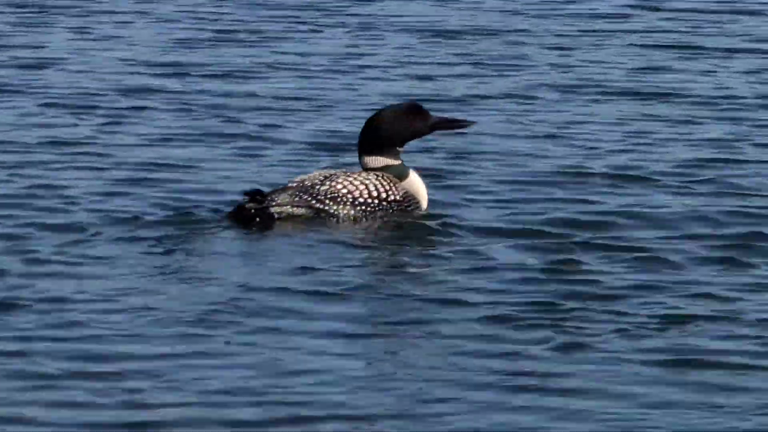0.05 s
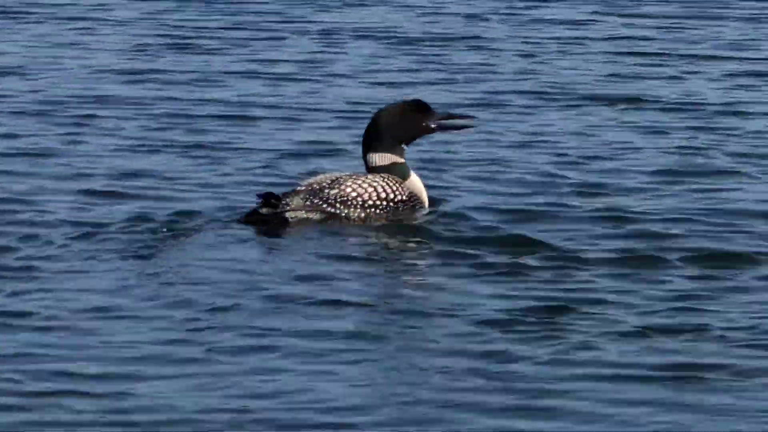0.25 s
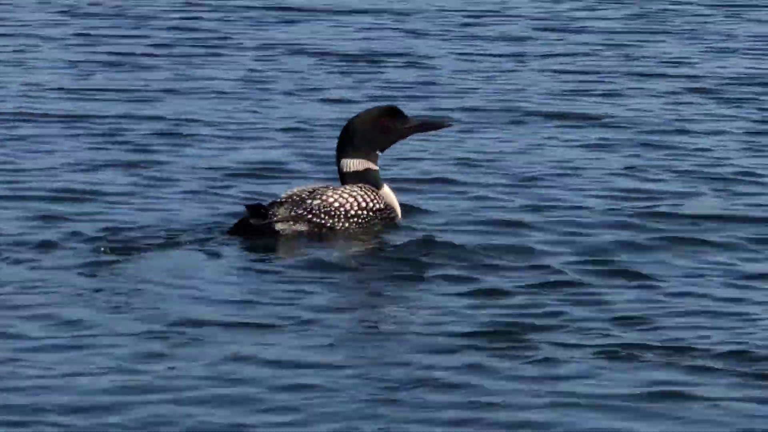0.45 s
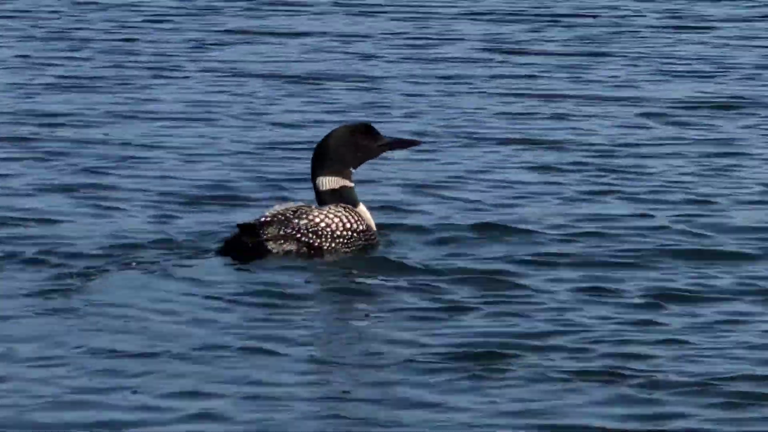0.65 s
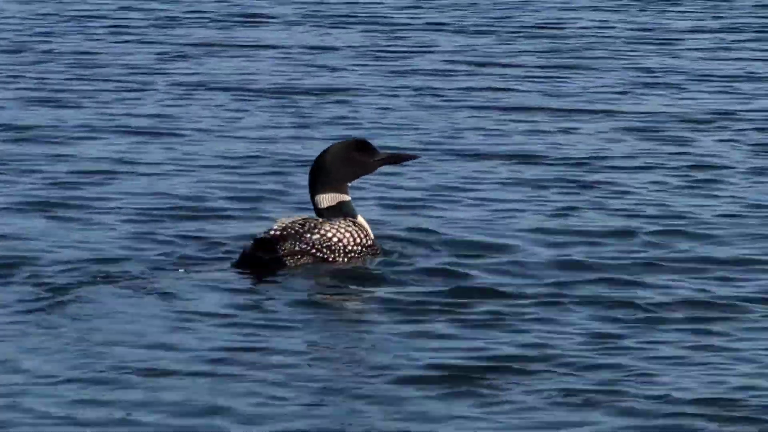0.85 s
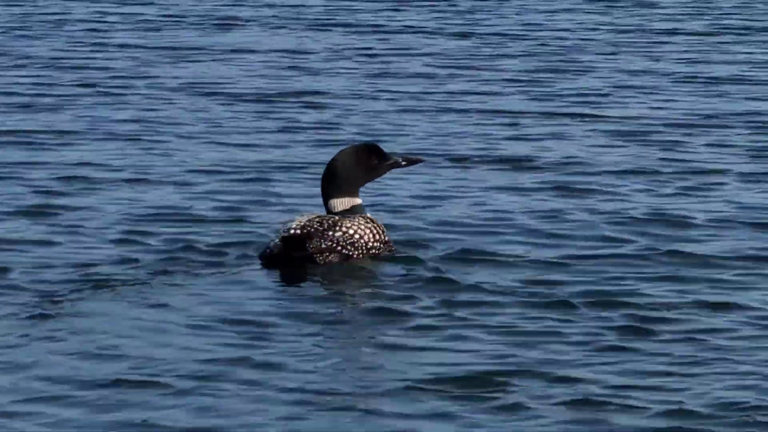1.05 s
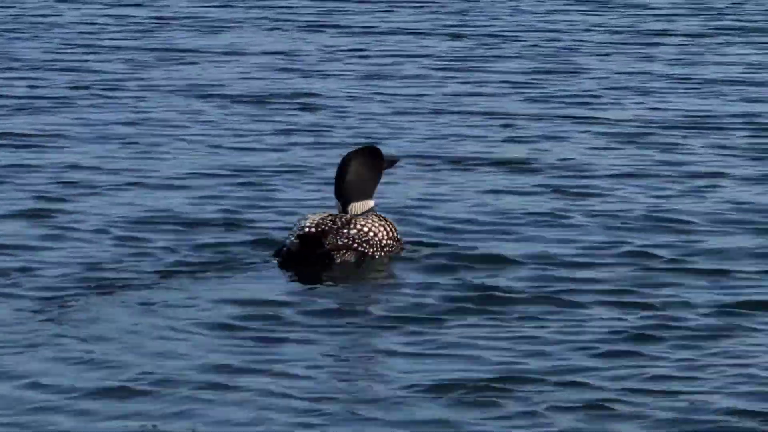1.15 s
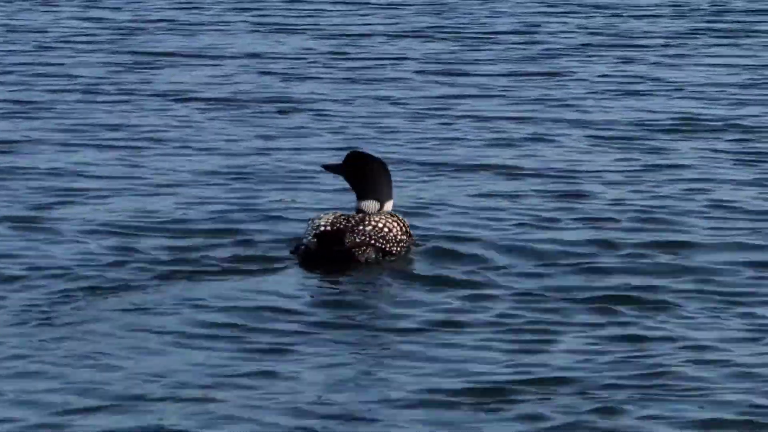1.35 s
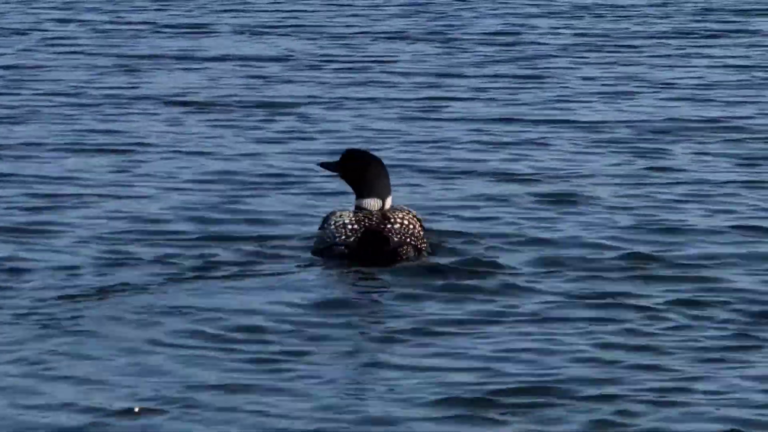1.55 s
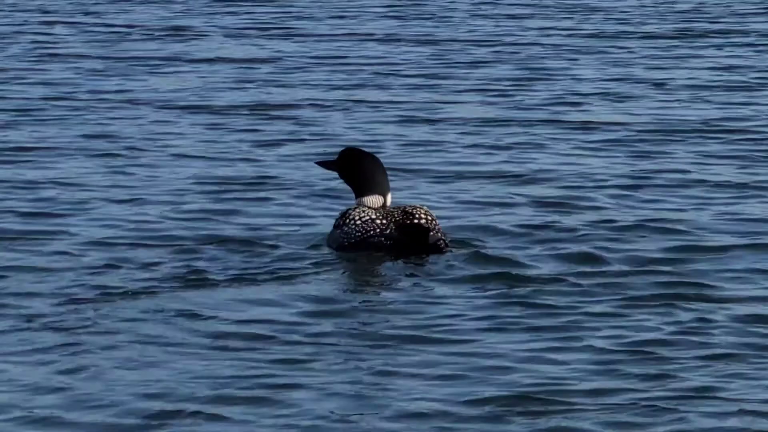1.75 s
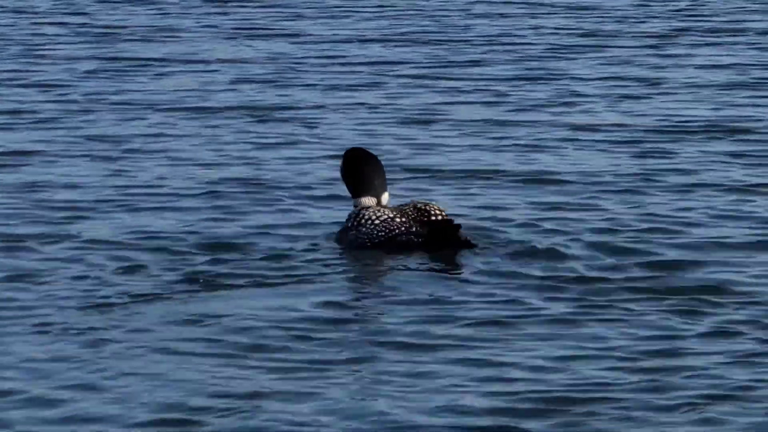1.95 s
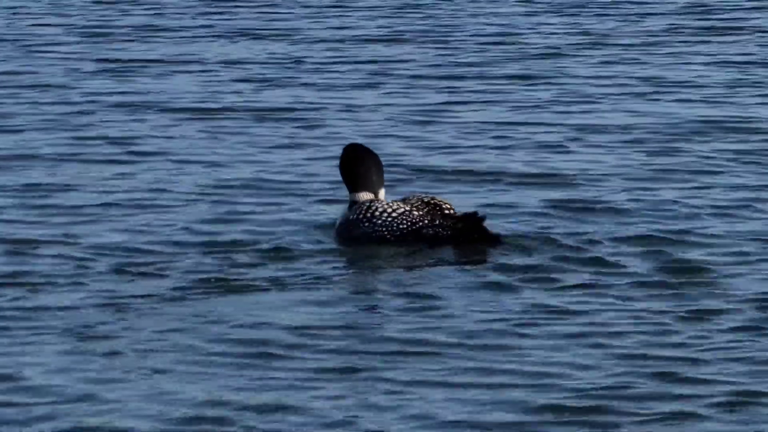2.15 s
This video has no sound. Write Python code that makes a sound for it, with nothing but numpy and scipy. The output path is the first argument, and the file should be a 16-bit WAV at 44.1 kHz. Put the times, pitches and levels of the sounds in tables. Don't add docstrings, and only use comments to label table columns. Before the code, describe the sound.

Loud loon calls, a smooth wail and a yodelling three-beat tremolo, echo faintly across a windy lake

```python
import sys
import numpy as np
from scipy import signal
from scipy.io import wavfile
from scipy.ndimage import uniform_filter1d, minimum_filter1d

SR = 44100
rng = np.random.default_rng(int(sys.argv[2]) if len(sys.argv) > 2 else 0)


def rack_gain(trim_db):
    fader = np.asarray(trim_db, float)
    return 10 ** (fader / 20)


def pcm_store(signal):
    levels = np.round(np.clip(np.atleast_2d(signal), -1, 1) * 32767)
    wavfile.write(sys.argv[1], SR, levels.astype(np.int16).T)


N = 97020
T = np.arange(N) / SR
SIDES = np.array([[1], [-1]])


def band(x, lo_hz, hi_hz):
    return signal.sosfilt(signal.butter(2, [lo_hz, min(hi_hz, .45 * SR)], "band", fs=SR, output="sos"), x)


def unit(x):
    return x / np.sqrt(np.mean(x ** 2))


def walk(rate_hz):
    k = int(SR / rate_hz)
    return unit(uniform_filter1d(uniform_filter1d(rng.standard_normal(N), k), k))


# [hz, level_db per Hz]
LAKE_SPECTRUM = [(100, 2), (300, -8), (700, -9), (1100, -21), (2700, -19), (4200, -27.5), (7300, -41.5),
                 (11500, -30), (14000, -30)]


def lake():
    level_db, wide_hz, top_left_db = -62.5, 1300, 4
    table_hz, table_db = np.array(LAKE_SPECTRUM).T
    out, swell = 0, walk(6.7)
    for hz in 100 * 2 ** np.arange(0, 7.1, 1 / 3):
        mid, side = unit(band(rng.standard_normal((2, N)), hz / 2 ** (1 / 6), hz * 2 ** (1 / 6)))
        db = np.interp(np.log(hz), np.log(table_hz), table_db) + 10 * np.log10(hz)
        db = db + (swell + 2.1 * walk(19)) * min(1500 / hz, 1)
        db = db + (hz > 7500) * top_left_db * SIDES / 2
        width = np.clip(hz / wide_hz, .3, 1)
        out = out + rack_gain(db) * (mid + width * side * SIDES)
    return rack_gain(level_db) * out / np.sqrt(np.mean(out.mean(axis=0) ** 2))


# [centre_s, half_length_s, level_db, rattle_db above the low push]
GUSTS = [(0.049, 0.32, -57, -6.5), (0.25, 0.11, -53.5, -17), (0.328, 0.067, -52.5, -14),
         (0.444, 0.076, -45, -11.5), (0.557, 0.1, -53.5, -14), (0.697, 0.081, -50.5, -17.5),
         (0.761, 0.056, -37, -31), (0.865, 0.077, -44.5, -13), (0.944, 0.028, -50, 0.5),
         (0.982, 0.035, -52.5, -7), (1.067, 0.054, -50.5, -12), (1.221, 0.052, -44.5, -7),
         (1.534, 0.078, -64, 3.5), (1.715, 0.053, -49, -25.5), (1.79, 0.049, -41, -36),
         (1.905, 0.12, -52, -17.5), (2.018, 0.081, -58, -7)]


def wind():
    wind_hz, wind_side, rattle_side, left_db, calm_db = 53, .75, .3, -.5, -67.5
    mid, side = rng.standard_normal((2, N))
    air = mid + wind_side * side * SIDES
    low = unit(band(band(air, .55 * wind_hz, 1.364 * wind_hz), 22, 87))
    rattle = unit(band(mid + rattle_side * side * SIDES, 100, 380))
    push, shake = rack_gain(calm_db), 0
    for centre, half, db, rattle_db in GUSTS:
        puff = np.cos(np.clip((T - centre) / half, -1, 1) * np.pi / 2) ** 2
        push = push + rack_gain(db) * puff
        shake = shake + rack_gain(db + rattle_db) * puff
    shake = shake * rack_gain(4 * walk(60))
    return (push * low + shake * rattle) * rack_gain((1.7 * walk(4) + left_db / 2) * SIDES)


# [start_s, length_s, from_hz, to_hz, level_db]
CHIRPS = [(0.928, 0.021, 2570, 2720, -61.5), (0.953, 0.052, 3020, 3320, -70),
          (1.015, 0.025, 2370, 2500, -64), (1.033, 0.039, 3550, 3110, -71), (0.986, .025, 3253, 3400, -72),
          (.99, 0.04, 2620, 2640, -71), (1.09, 0.042, 3250, 3160, -73.5), (1.105, .035, 2890, 2629, -73),
          (1.125, .035, 3232, 3500, -74), (1.149, 0.04, 2840, 2530, -75), (1.48, .03, 2900, 3050, -73),
          (1.52, .035, 2850, 3350, -73.5), (1.5, 0.071, 2450, 2570, -71.5), (1.571, 0.021, 2796, 2730, -72),
          (1.581, 0.058, 2750, 2300, -71.5), (1.755, .03, 2200, 2300, -75), (1.775, .02, 2700, 2768, -72.5),
          (1.835, 0.032, 2850, 2800, -74), (1.854, .02, 4200, 3820, -74), (1.96, 0.027, 2880, 2910, -68),
          (2.148, .03, 2750, 2798, -68), (2.175, 0.027, 3080, 3220, -77), (1.719, 0.037, 2890, 2512, -70.5),
          (1.788, 0.034, 3700, 4230, -71), (1.791, .05, 2936, 2910, -66), (1.889, 0.05, 2960, 2490, -59.5),
          (1.927, 0.046, 2470, 2770, -66), (2.102, 0.041, 2760, 2690, -73)]


def songbirds():
    out = 0
    for start, length, from_hz, to_hz, db in CHIRPS:
        u = np.clip((T - start) / length, 0, 1)
        hz = (from_hz + (to_hz - from_hz) * u) * (1 + .014 * walk(90))
        phase = 2 * np.pi * np.cumsum(hz) / SR
        out = out + rack_gain(db + 2.1 * walk(120)) * np.sin(np.pi * u) * np.sin(phase + .4 * SIDES)
    return out


# [start_s, peak_db, ring_hz, t60_s, left_minus_right_db]
KNOCKS = [(.883, -66.5, 7040, .01, 4), (.921, -52, 626, 0.031, -9), (.929, -44.5, 630, 0.028, -10),
          (0.934, -31, 425, 0.032, -3.5), (0.932, -37.5, 144, 0.13, 4), (0.948, -69, 425, 0.029, -2),
          (1.201, -57.5, 1269, 0.025, 28), (1.207, -36, 1156, 0.029, -10.5), (1.21, -48, 2740, 0.013, 1),
          (1.21, -43, 1890, 0.01, -8), (1.214, -44, 291, 0.059, -1.5), (1.221, -47.5, 1250, 0.028, 12),
          (1.877, -49.5, 2080, .015, -10), (1.985, -68, 6700, 0.028, 6), (1.872, -48, 3030, 0.023, -5.5),
          (1.878, -45, 2690, 0.015, -7), (1.879, -57.5, 1100, 0.036, -6), (1.912, -42.5, 2540, 0.012, 4.5),
          (1.917, -43, 1934, 0.022, -10), (1.916, -53.5, 1050, 0.067, -9), (1.928, -49, 327, 0.075, 7),
          (1.945, -54, 11030, 0.0071, 1.5), (2.055, -47.5, 290.6, 0.074, -0.5)]


def hull():
    out = 0
    for start, db, hz, t60, pan_db in KNOCKS:
        t = np.clip(T - start, 0, None)
        shape = np.exp(-np.log(1000) * t / t60) * (1 - np.exp(-(t / .001) ** 2))
        ring = min(hz / 900, 1) * np.sin(2 * np.pi * hz * t)
        rattle = unit(band(band(rng.standard_normal(N), .7 * hz, 1.22 * hz), .6 * hz, 1.3 * hz))
        out = out + rack_gain(db + 2.5 + pan_db * SIDES / 2) * shape * (ring + .45 * rattle)
    return out


def echoes(x):
    water, shore = rng.standard_normal((2, 2, N))
    shore = unit(band(shore, 430, 720) + rack_gain(-12.5) * band(shore, 1100, 1700)) * rack_gain(2.5 * walk(12))
    tail = 0
    for noise, db, t60_s, rise_s in [(water, -31, .38, .06), (shore, -50, 3.6, .3)]:
        fade = np.exp(-np.log(1000) * T / t60_s) * np.clip(T / rise_s, 0, 1)
        tail = tail + rack_gain(db) * noise * fade / np.sqrt(np.sum(fade ** 2))
    return signal.fftconvolve(x.mean(axis=0)[None], tail)[:, :N]


def curve(rows):
    s, hz, db = np.array(rows).T
    k = int(.009 * SR)
    return uniform_filter1d(np.interp(T, s, hz), k), uniform_filter1d(np.interp(T, s, db, -140, -140), k)


def voice(hz, partials_db, ears):
    hz = hz * (1 + .0015 * walk(150))
    phase, out = 2 * np.pi * np.cumsum(hz) / SR, 0
    ear_hz, ear_db, ear_lead = np.array(ears).T
    for k, db in enumerate(partials_db, 1):
        at = np.log(k * hz)
        pan_db = np.interp(at, np.log(ear_hz), ear_db) * SIDES / 2
        lead = np.interp(at, np.log(ear_hz), ear_lead) * SIDES / 2
        rasp = 1 + rack_gain(-32) * k * walk(120)
        out = out + rack_gain(db + pan_db) * rasp * np.cos(k * phase + lead)
    return out


# [time_s, pitch_hz, level_db]
WAIL = [
    (.008, 614, -64),
    (.035, 623.6, -39),
    (.06, 632, -34.5),
    (.1, 649.8, -31.5),
    (.15, 659.5, -29.5),
    (.3, 657, -25),
    (.37, 658.2, -29),
    (.48, 640.7, -28.5),
    (.56, 640, -59),
]
WAIL_PARTIALS_DB = [-5.5, 3.5, -20, -48]
# [hz, left_minus_right_db, left_lead_rad]
FAR_EARS = [(640, 1.1, 0.2), (1300, -6, 1.2), (1920, -8.5, 0.27), (2684, -20, 6.5)]


def far_loon():
    hz, db = curve(WAIL)
    below_peak = db - db.max()
    parts = [db + p + 10 * min(k, 2) * below_peak / 20 for k, p in enumerate(WAIL_PARTIALS_DB)]
    return voice(hz, parts, FAR_EARS)


# [time_s, pitch_hz, level_db]
CLIMB = [
    (.165, 358, -67.5),
    (.18, 358, -41.5),
    (.205, 331.2, -36),
    (.22, 372, -31),
    (.24, 425.6, -22),
    (.255, 460.6, -20),
    (.272, 483.2, -23.5),
    (.286, 511, -20),
    (.296, 514.1, -60),
]
# [time_s, pitch_hz, level_db]
DROP = [
    (.758, 391.7, -63),
    (.77, 374, -42.5),
    (.782, 350.4, -43),
    (.8, 319, -52),
    (.812, 317, -87.5),
]
CLIMB_PARTIALS_DB = [-15, 0.5, -1, 2.5, -15.5, -38, -56]
DROP_PARTIALS_DB = [-0.5, -0.5, -1.5, -16.5, -26]
# [hz, left_minus_right_db, left_lead_rad]
NEAR_EARS = [(400, 1, -0.55), (640, 1, -0.46), (740, 2, -1.05), (940, -8.5, -0.082), (1230, -2, 0.1),
             (1430, -5.5, -.6), (1700, -4.5, -.2), (2300, -5.5, 0.79), (4795, -6, 1.6)]


def near_loon_low():
    hz, db = curve(CLIMB)
    below_peak = db - db.max()
    shut_db = -1900 * np.clip(T - .266, 0, None)
    parts = [db + p + 4.5 * k * below_peak / 20 + (k > 2) * shut_db for k, p in enumerate(CLIMB_PARTIALS_DB)]
    climb = voice(hz, parts, NEAR_EARS)
    hz, db = curve(DROP)
    return climb + voice(hz, [db + p for p in DROP_PARTIALS_DB], NEAR_EARS)


# [centre_hz, width_hz, level_db]
THROAT = [(3300, 400, -29), (3880, 250, -33.5), (4620, 350, -31), (5250, 550, -31.5), (6350, 550, -35),
          (7060, 450, -42.5), (8200, 500, -48.5), (9250, 600, -40), (9850, 400, -45), (10350, 310, -42),
          (11600, 270, -44.5)]


def throat_db(hz):
    return 10 * np.log10(sum(rack_gain(2 * g) / (1 + (2 * (hz - c) / w) ** 2) ** 2 for c, w, g in THROAT))


# [time_s, pitch_hz, level_db]
HOLD = [
    (.286, 628.3, -31.5),
    (.298, 628.9, -20.5),
    (.42, 650.2, -21),
    (.54, 640, -20.5),
    (.635, 626.4, -25),
    (.675, 614.7, -27),
    (.71, 622.3, -26.5),
    (.735, 602.5, -32),
    (.768, 565.4, -57),
]
# [centre_s, half_length_s, pitch_lift_hz, harshness_db]
BEATS = [
    (0.363, 0.047, 148, 0),
    (.469, 0.046, 148, 4),
    (0.586, 0.042, 98.7, -2.5),
]
# [rest_db, full_beat_gain_db]
HOLD_PARTIALS = [(-3, 13.5), (-0.5, 17.5), (-42.5, 30.5), (-52, 31), (1.5, -11), (2.5, -1.5), (-1, 1.5),
                 (-8, 7), (-4, 6.5), (-5.5, -10.5), (-3.5, 0), (0.5, 1), (0.5, 1), (-0.5, -1), (-1.5, 2),
                 (-1, 0.5)]


def near_loon_tremolo():
    hz, db = curve(HOLD)
    lift = 0
    for centre, half, up_hz, _ in BEATS:
        lift = lift + up_hz * np.cos(np.clip((T - centre) / half, -1, 1) * np.pi / 2).clip(0) ** 1.3
    lift = uniform_filter1d(lift, int(.002 * SR))
    full_lift_hz, bright_to_s, patchy_db = 148, .625, 3.5
    effort = lift / full_lift_hz
    late = np.interp(T - .006, T, lift) / full_lift_hz
    swell = (effort ** 2 * (3 - 2 * effort)) ** 1.15
    harsh_db = np.interp(T, [b[0] + .016 for b in BEATS], [b[3] for b in BEATS])
    dull_db = 28 * np.clip(np.minimum(T - .335, bright_to_s - T) / .018, -1, 0)
    cold_db = 14 * np.clip((T - .4) / .04, -1, 0)
    flare_db = 6 * (np.interp(T - .02, T, effort) - effort) + harsh_db + cold_db
    slack_db = -7 * np.clip(1 - late / .4, 0, 1) * (T < bright_to_s)
    parts = []
    for k, (rest_db, beat_db) in enumerate(HOLD_PARTIALS):
        level = db + rest_db + beat_db * (swell if k < 2 else late ** .75)
        if k in (2, 3):
            level = level + patchy_db / 2 * walk(46) + (k - 1) * slack_db
        if k > 3:
            level = level + throat_db((k + 1) * (hz + lift)) + patchy_db * walk(50)
            level = level + dull_db + flare_db * np.clip((k - 5) / 4, 0, 1)
        parts.append(level)
    breath = unit(band(rng.standard_normal((2, N)), 3300, 10000))
    breath_db = db - 48.5 + 8 * late + flare_db + dull_db
    return voice(hz + lift, parts, NEAR_EARS) + rack_gain(breath_db) * breath


def scene():
    birds = far_loon() + near_loon_low() + near_loon_tremolo()
    return lake() + wind() + songbirds() + hull() + echoes(birds) + birds


def band_limit(x):
    return signal.sosfilt(signal.butter(12, 15680, fs=SR, output="sos"), x)


# [time_s, level_db]
TICKS = [
    (0.326, -56.5),
    (.335, -53),
    (0.3445, -39.5),
    (.355, -49),
    (.456, -46),
]


def record(dry):
    loud = uniform_filter1d(np.abs(dry).max(axis=0), size=5000, origin=2400)
    top = signal.sosfiltfilt(signal.butter(8, 11200, "high", fs=SR, output="sos"), dry)
    x = dry - top * np.clip((loud / rack_gain(-25) - 1) / 2, 0, 1)
    room = np.minimum(1, .99 / np.maximum(np.abs(x).max(axis=0), 1e-9))
    x = x * uniform_filter1d(minimum_filter1d(room, size=401), size=200)
    x = signal.sosfiltfilt(signal.ellip(10, .1, 40, 14500, fs=SR, output="sos"), x)
    for s, db in TICKS:
        x[1, int(s * SR)] -= rack_gain(db)
    return band_limit(x)


dry = scene()
out = record(dry)
pcm_store(out)
```